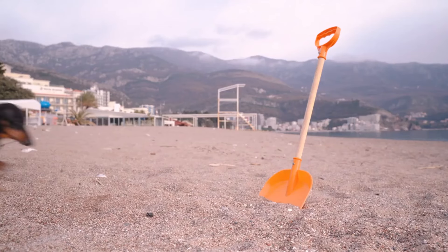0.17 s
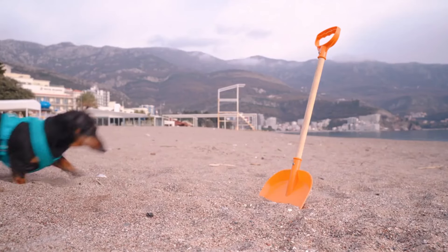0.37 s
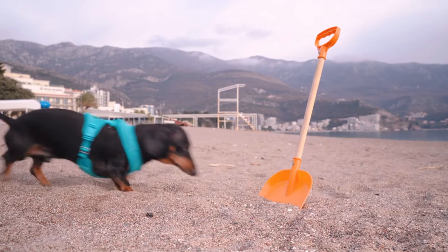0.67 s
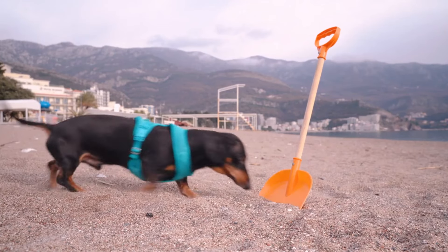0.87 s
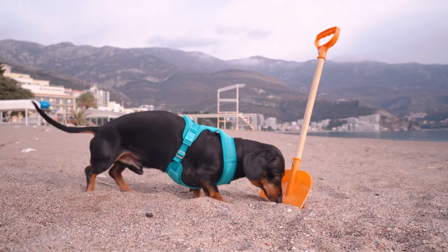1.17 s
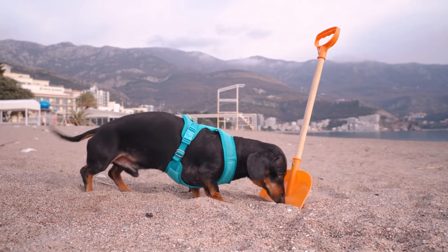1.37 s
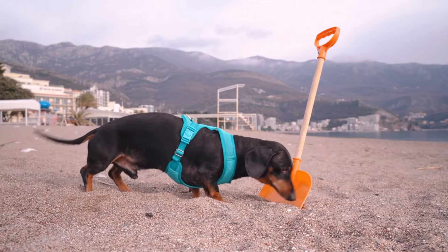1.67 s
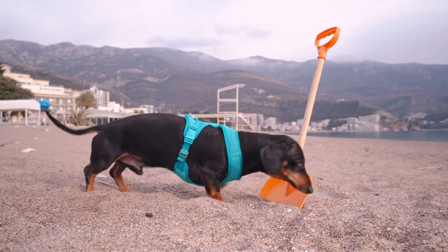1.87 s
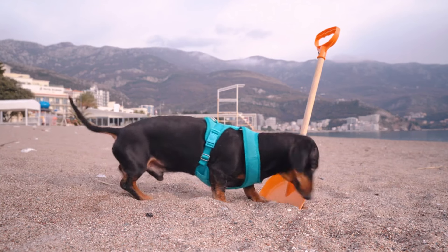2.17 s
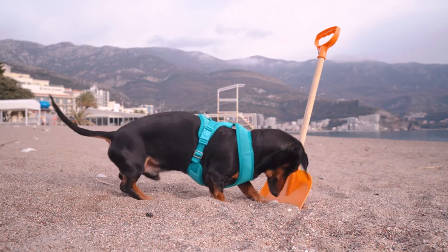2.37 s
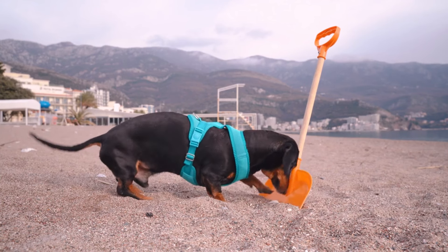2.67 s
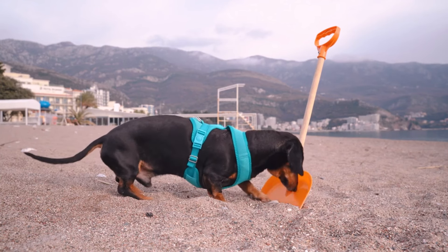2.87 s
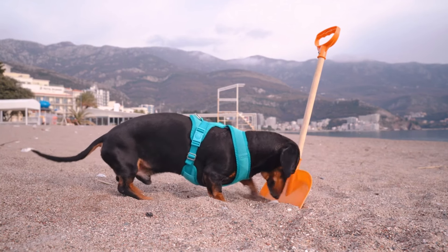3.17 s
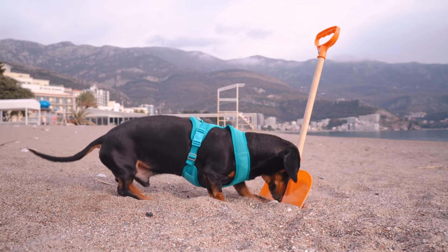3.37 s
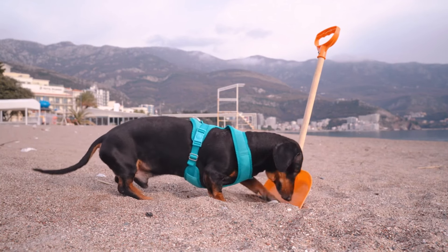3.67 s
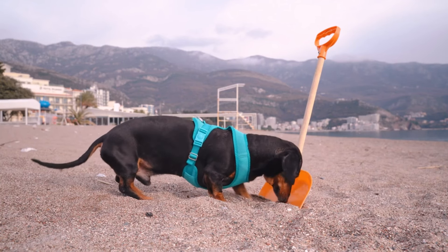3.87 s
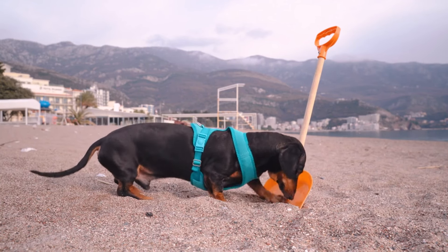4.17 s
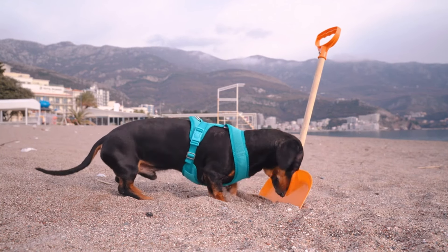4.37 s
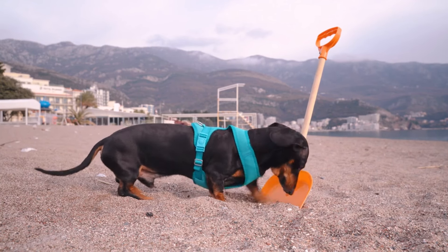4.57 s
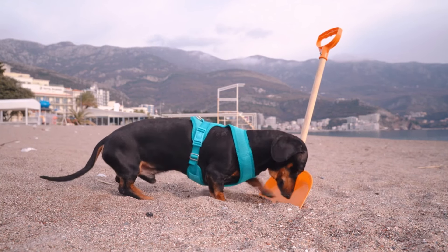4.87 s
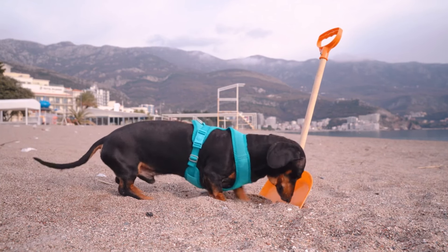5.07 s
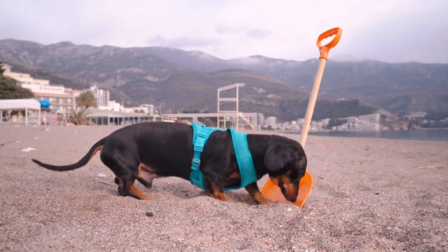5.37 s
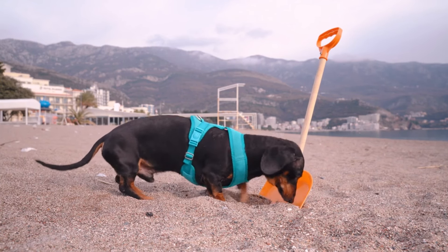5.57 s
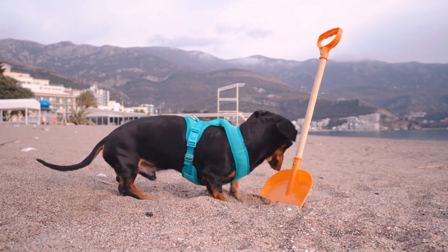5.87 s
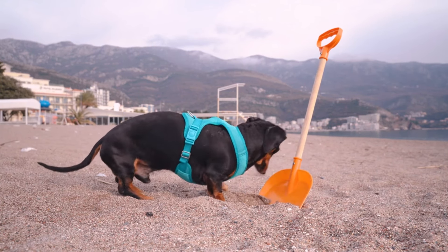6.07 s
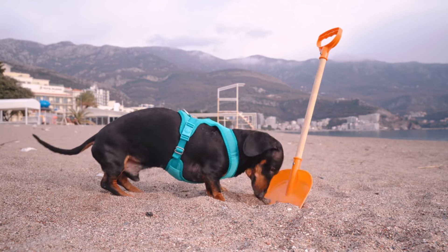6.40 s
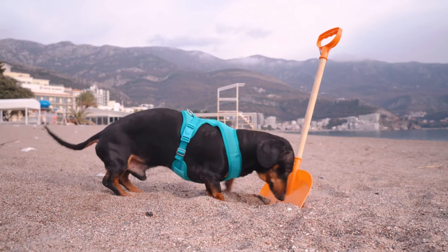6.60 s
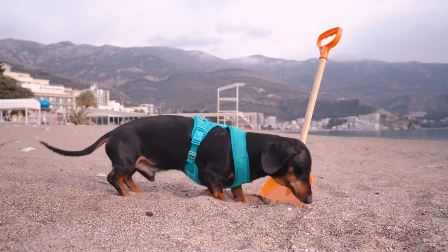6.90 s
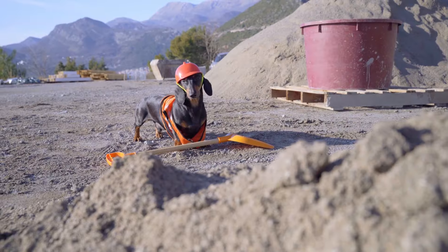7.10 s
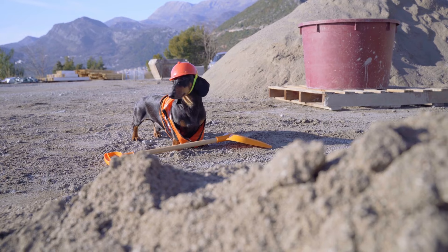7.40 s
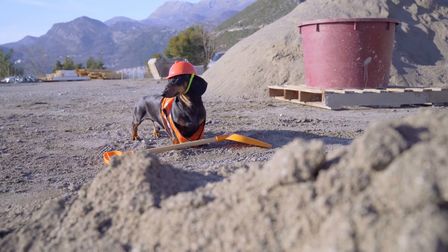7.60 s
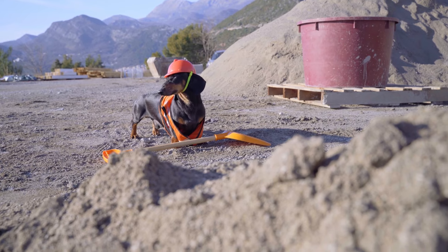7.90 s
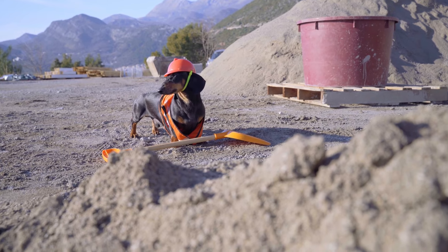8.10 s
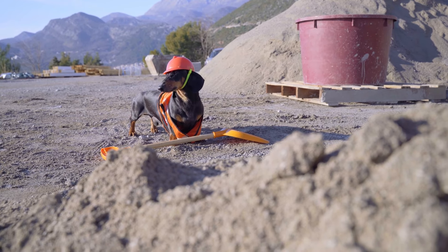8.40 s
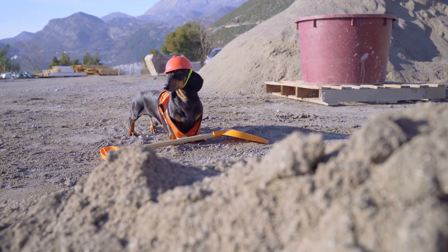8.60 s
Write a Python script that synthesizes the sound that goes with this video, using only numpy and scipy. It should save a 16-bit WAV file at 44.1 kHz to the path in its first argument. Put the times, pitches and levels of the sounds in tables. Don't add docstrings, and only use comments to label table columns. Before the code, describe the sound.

A close, dry outdoor beach sound, with very faint surf, low wind puffs and a distant engine hum throughout. At 0 s a dog's paw rakes coarse sand over a spade blade, with crunch and small stone knocks. Around 0.6 s a stroke brings a very loud sharp clack on the metal; another gritty scrape comes at 1.1 to 1.3 s. Quick, bright, fluttering sniffs run from 1.3 to 1.9 s. Sparse grains tick, a light scrape with a thin ring falls at 2.7 s, and sniffs return from 2.9 to 3.3 s. After near quiet, a hard dig lands at 4.1 s. Three sniffs follow at 4.8 to 5.3 s, overlapping a light scrape and falling grains. From 6.5 s digging resumes, becoming rapid scrapes and knocks from 7 to 8.3 s, strongest near 7.7 s. Loose grains trickle until about 8.7 s.

```python
import sys
import numpy as np
from scipy import signal
from scipy.fft import rfft, irfft, next_fast_len
from scipy.io import wavfile
from scipy.ndimage import uniform_filter1d

SR = 44100
rng = np.random.default_rng(int(sys.argv[2]) if len(sys.argv) > 2 else 0)


def persist_wave(psi):
    counts = np.round(np.clip(psi, -1, 1) * 32767).astype(np.int16)
    wavfile.write(sys.argv[1], SR, np.atleast_2d(counts).T)


def how_loud(loudness_db):
    steps = np.asarray(loudness_db, float) / 20
    return 10 ** steps


N = 385786
T = np.arange(N) / SR

# (pitch_hz, level_db, time to fade by 60 dB ring_s)
BLADE_MODES = [(437, -28.5, 0.12), (860, -30, 0.11), (1010, 7, 0.48), (1460, 8.5, 0.15), (2054, -12.5, 0.2),
               (2400, -11, 0.66), (3300, -4.5, 0.13), (3656, -1.5, 0.05), (4080, -4, 0.17),
               (4840, -13.5, 0.22), (5660, -2, 0.18), (7000, 0.5, .1), (7640, -1, 0.14), (8700, -3, 0.1)]

PAW_RISE_DB_S, PAW_FALL_DB_S = 2999.5, 799
SOFT_RISE_DB_S, SOFT_FALL_DB_S = 348, 400.5


def unit(x):
    return x / np.sqrt(np.mean(x ** 2))


def peak(x):
    return x / np.abs(x).max()


def colour(x, points):
    hz, db = np.transpose(points)
    size = next_fast_len(N)
    bins = np.arange(size // 2 + 1) * SR / size + 1
    gain = how_loud(np.interp(np.log(bins), np.log(hz), db))
    return irfft(rfft(x, size) * gain, size)[..., :N]


def band(x, lo_hz, hi_hz, order=2):
    edges = [lo_hz, min(hi_hz, SR / 2.2)]
    return signal.sosfilt(signal.butter(order, edges, "band", fs=SR, output="sos"), x)


def mode(x, hz, t60):
    pole = np.exp(2j * np.pi * hz / SR - np.log(1000) / (max(t60, .002) * SR))
    return signal.lfilter([1], [1, -pole], x).imag


def walk(rate):
    hold = int(SR / rate)
    levels = np.repeat(rng.standard_normal(N // hold + 1), hold)[:N]
    return .9 * uniform_filter1d(levels, hold)


def strokes(rows, rise_db_s, fall_db_s, tail_db=-99, tail_db_s=100):
    t = np.arange(0, N / SR + .002, .001)[:, None]
    s, length, start_db, end_db, *offset_db = np.transpose(rows)
    length = np.maximum(length, .002)
    hold = start_db + (end_db - start_db) * np.clip((t - s) / length, 0, 1)
    before = np.maximum(s - t, 0)
    after = np.maximum(t - s - length, 0)
    tail = np.maximum(start_db, end_db) + tail_db - tail_db_s * after
    tail = np.where(after > 0, tail, -200)
    db = np.maximum(hold - rise_db_s * before - fall_db_s * after, tail)
    return np.array([np.interp(T, t[:, 0], how_loud((db + o).max(axis=1))) for o in [0] + offset_db])


def grains(rate, scatter_db):
    hits = rng.random(N) < rate / SR
    size = np.minimum(rng.exponential(size=N), 4)
    return unit(hits * np.tanh(rng.standard_normal(N)) * how_loud(scatter_db * size))


def shore():
    # (pitch_hz, level_db per Hz)
    surf_tone = [(35, -42.5), (60, -17.5), (102, -12.5), (179, -25), (220, -16.5), (376, -26.5),
                 (443, -20.5), (486, -30), (521, -21.5), (559, -24), (1320, -27.5), (15500, -47)]
    # (full at start_s, length_s, start_db, end_db)
    puffs = [(0.0, 0.064, -64, -59), (.62, 0.03, -75.5, -51), (1.6, .2, -64.5, -60.5),
             (2.53, 0.11, -52.5, -54), (2.74, .04, -67, -51), (2.98, .06, -55, -59.5),
             (3.15, .05, -63.5, -61), (3.45, .1, -67, -70), (4.04, 0.094, -67.5, -73),
             (4.94, 0.53, -68, -71), (6.55, .06, -55, -68), (7.05, .6, -78, -81.5)]
    # (time_s, level_db)
    engine_db = [
        (0.0, -67.5),
        (3.09, -76),
        (4.75, -71.5),
        (6.02, -62.5),
        (8.75, -68),
    ]
    puff_db_s, calm_db = 160, -74
    mid, side = (colour(rng.standard_normal(N), surf_tone) for _ in range(2))
    surf = unit(mid + how_loud(-7.5) * side * np.array([[1], [-1]]))
    surf = how_loud(-57.5 - 8.0 + 0.67 * walk(0.77)) * surf
    wind = [unit(band(rng.standard_normal(N), 23, 46)) * how_loud(3.7 * walk(6.3)) for _ in range(2)]
    wind_gain = how_loud(2.0) * (how_loud(calm_db) + strokes(puffs, puff_db_s, puff_db_s)[0])
    engine = mode(rng.standard_normal(N), 101., 2.0)
    engine = engine + how_loud(-2) * mode(rng.standard_normal(N), 120., .9)
    engine = engine + how_loud(-5) * mode(rng.standard_normal(N), 230., .6)
    engine_gain = how_loud(-4.5) * how_loud(np.interp(T, *np.transpose(engine_db)))
    return surf + wind_gain * np.array(wind) + engine_gain * unit(engine)


def digging():
    # (full at start_s, length_s, rasp start_db, rasp end_db, spray above rasp offset_db)
    rakes = [(0.0, 0.042, -24, -27.5, 2), (.575, 0.062, -40, -21.5, 0), (1.133, 0.069, -25, -23, 0.5),
             (1.2, 0.15, -22.5, -35, -3.5), (2.672, .19, -30, -43.5, 0), (4.034, 0.0096, -42.5, -36, 1.5),
             (4.046, 0.1, -30, -30.5, 3.5), (4.107, 0.05, -28.5, -25.5, 2.5),
             (4.15, 0.062, -32.5, -41.5, -16.5), (5.284, 0.15, -41, -34.5, -1),
             (5.43, 0.092, -36, -51.5, -1), (6.461, 0.091, -26, -34.5, 1.7),
             (6.526, 0.081, -31.5, -53.5, 4.5), (6.64, 0.076, -49, -56.5, 8),
             (7.034, 0.064, -26, -37.5, -4.5), (7.09, 0.039, -29, -27, -1.5),
             (7.135, 0.021, -30, -28.5, -6.5), (7.172, 0.011, -32, -33.5, -4.5),
             (7.185, .05, -37, -42, -3.5), (7.24, 0.089, -46.5, -40, -8), (7.33, 0.155, -38, -52.5, -6),
             (7.49, 0.039, -41, -45, -1), (7.547, 0.082, -38, -24, -0.5), (7.62, 0.062, -31, -22.5, -8),
             (7.706, 0.061, -37.5, -37.5, -7), (7.771, 0.08, -43.5, -48.5, -3.5), (7.87, 0.1, -50, -55, -3),
             (8.122, 0.17, -32, -42.5, -7.5), (8.322, 0.062, -51, -53.5, -12.5)]
    shuffles = [(.23, 0.011, -67, -55.5, 1), (.565, .02, -47.5, -45, -10.5), (.335, 0.077, -55, -46.5, 1.1),
                (.485, 0.1, -49.5, -58, -3.5), (.88, 0.074, -57.5, -57.5, -4.5),
                (1.04, 0.087, -59, -38, -1.5), (2.555, 0.13, -57.5, -56.5, -6),
                (3.7, 0.055, -75.5, -71.5, -14), (4.45, .33, -72, -76, -1.5),
                (5.565, 0.31, -57, -72.5, 0.5), (5.82, 0.2, -72, -78.5, 4), (6.8, 0.113, -61.5, -53, -0.2),
                (6.945, 0.084, -60.5, -34.5, -0.5), (7.42, 0.016, -51.5, -53, 4),
                (8.04, 0.083, -69.5, -46, -4), (8.43, 0.15, -73.5, -54, -3),
                (8.6, 0.16, -63.5, -71.5, -2.5)]
    # (full at start_s, length_s, lumps start_db, lumps end_db, weight above lumps offset_db)
    crushes = [(.008, 0.037, -15.5, -29, -5), (.58, 0.07, -52.5, -25.5, -4),
               (1.133, 0.068, -31, -28, -34.5), (1.22, 0.07, -36, -36, -20),
               (1.287, 0.019, -26.5, -32.5, -17), (4.047, 0.063, -40.5, -40.5, -16),
               (4.111, 0.071, -19, -32, -3), (6.461, 0.073, -49, -28.5, -11),
               (7.034, 0.048, -22.5, -39, -10), (7.112, 0.16, -25, -56, -10),
               (7.33, 0.074, -42.5, -63, -30.5), (7.41, .12, -47, -30, 1.5), (7.55, 0.1, -38, -25.5, -5.5),
               (7.67, 0.12, -28.5, -40, -26.5), (7.74, 0.09, -42.5, -36, -34.5),
               (7.85, 0.14, -46.5, -49.5, 4), (8.128, 0.14, -30, -36.5, -35)]
    treads = [(.24, 0.0099, -56, -51.5, -13), (.35, 0.27, -53, -67, -33), (.66, 0.14, -60, -52, -12),
              (.87, 0.067, -54.5, -56, -20), (1.03, 0.11, -68.5, -46.5, -16), (1.325, 0.25, -51.5, -66, -4),
              (2.67, 0.28, -57, -59.5, -4.5), (5.12, 0.21, -75, -56.5, -7), (5.43, 0.18, -50.5, -62, -4),
              (6.82, 0.3, -65.5, -49.5, -24), (8.289, 0.11, -61, -61, -25), (8.53, 0.066, -59, -60, -27.5)]
    grit_gain = strokes(rakes, PAW_RISE_DB_S, PAW_FALL_DB_S, -20.5, 134.5)
    grit_gain = grit_gain + strokes(shuffles, SOFT_RISE_DB_S, SOFT_FALL_DB_S)
    lump_gain = strokes(crushes, PAW_RISE_DB_S, PAW_FALL_DB_S, -25, 208)
    lump_gain = lump_gain + strokes(treads, SOFT_RISE_DB_S, SOFT_FALL_DB_S)
    return (*grit_gain, *lump_gain)


def blade(push, damping, sway_db=None):
    sway_db = np.zeros(len(BLADE_MODES)) if sway_db is None else sway_db
    out = 0
    for (hz, db, t60), sway in zip(BLADE_MODES, sway_db):
        ring_s = t60 * damping
        share = how_loud(db) * np.sqrt(1 / (ring_s * SR))
        out = out + share * mode(push * how_loud(sway), hz, ring_s)
    return out


def pebbles(low_hz, span, count=200):
    ring_s, hits_per_s = .075, 400
    t = np.arange(int(ring_s * SR)) / SR
    size = np.arange(count)[:, None] / count
    rings = how_loud(-6 * size) * np.sin(2 * np.pi * low_hz * span ** size * t) * 1000 ** (-t / ring_s)
    out = np.zeros(N + len(t))
    for place, which, force in rng.random((int(hits_per_s * N / SR), 3)):
        start = int(place * N)
        out[start:start + len(t)] += how_loud(14 * force) * rings[int(which * count)]
    return unit(out[:N])


def grit(slide, spray, ring):
    # (pitch_hz, level_db per Hz)
    grit_tone = [(880, -31.5), (1500, 3), (2860, -8), (3210, -7), (4440, -6), (5670, -4.5), (6960, -7),
                 (9990, -4.5), (15500, -15.5)]
    # (full at start_s, length_s, start_db, end_db)
    singing = [
        (2.68, .02, -42, -42.5),
        (5.425, .05, -40, -45.5),
        (7.105, .02, -44, -46),
    ]
    rasp = (grains(8000., 2.6) + .28 * grains(300., 2.8)) * how_loud(2.0 * walk(130))
    sway_db = [7 * walk(14) for _ in BLADE_MODES]
    upper = band(blade(rasp, damping=.45, sway_db=sway_db), 1900, 10000, order=3)
    hiss = unit(colour(rasp, grit_tone)) + how_loud(-5) * unit(upper) + how_loud(-7) * pebbles(1600, 6)
    coarse = colour(hiss, [(1200, -18), (2000, 0), (6000, 0), (7300, -6), (9500, -40)])
    fine = colour(hiss, [(5500, -40), (7300, -6), (8500, 0)])
    buried = ring * unit(mode(rasp * how_loud(5 * walk(12)), 1425., .035))
    free = strokes(singing, 700, 300)[0] * rasp
    free = mode(free, 1418., .45) / np.std(mode(rasp, 1418., .45))
    return how_loud(2.23) * slide * unit(coarse) + how_loud(-0.3) * spray * unit(fine) + how_loud(6.5) * buried + free


def crush(lumps, weight):
    crumbs = grains(3000., 2.0) * how_loud(2.0 * walk(90))
    body = unit(band(crumbs, 380, 1450, order=3)) + how_loud(-4) * pebbles(400, 3.5)
    thud = unit(band(grains(1500., 0.59), 120, 420, order=3))
    return how_loud(-2.0) * lumps * body + how_loud(-7.0) * weight * thud


def knocks():
    # (start_s, peak level_db, brightness_db, pitch_hz, ring_s to fade 60 dB)
    stones = [(.0071, -8.5, 0, 1400, 0.027), (.0093, -2.5, -4, 760, .018),
              (.0120, -8.5, -10, 800, 0.01), (0.0207, -13, -8.5, 900, 0.0082),
              (.0318, -16.5, -5.5, 850, .015), (.0490, -17, -5, 1045, 0.012),
              (0.0509, -6, -3, 1080, 0.013), (.0635, -17.5, -12, 2400, 0.007),
              (.243, -37.5, -12, 1010, 0.048), (0.6411, 4, -0.5, 930, 0.027),
              (0.6434, 6, -1, 1050, 0.0097), (0.6445, 0, -5, 1410, 0.044),
              (1.1313, -18, -0.5, 1800, 0.013), (1.145, -10.5, -3, 1290, 0.02),
              (1.189, -18, -11.5, 1300, 0.049), (1.197, -15, -8.5, 800, .02),
              (1.2135, -16.5, -14, 1600, 0.028), (1.2865, -16.5, -21, 1000, 0.014),
              (1.2915, -13.5, -18, 1100, 0.014), (1.303, -19, -9.5, 1000, 0.035),
              (1.369, -28, -17.5, 940, .035), (2.673, -27.5, -0.5, 1420, 0.082),
              (4.1092, -7, -4.5, 1506, 0.062), (4.1111, -6.5, -18, 750, 0.0071),
              (4.1134, -5.5, -14.5, 1500, 0.053), (4.1252, -18.5, -9.5, 700, 0.014),
              (4.1349, -6.5, 1.5, 1800, 0.022), (4.1402, -10.5, 3.5, 1900, .02),
              (4.1572, -10.5, -15.5, 950, 0.034), (5.085, -43.5, -12, 1040, 0.03),
              (5.201, -50, -9.5, 1220, .035), (5.284, -39, -16, 700, 0.012),
              (5.358, -28, -20, 1450, 0.11), (5.369, -18.5, 1, 2300, 0.03),
              (5.513, -44, -20, 620, .025), (5.540, -53, -16, 600, 0.013),
              (5.5655, -28, 4, 1800, .015), (5.577, -41.5, -16, 800, .02),
              (6.467, -11.5, 4, 1435, .05), (6.526, -21, 0, 1430, .035),
                    (7.0309, -15.5, -9, 1280, .05), (7.039, -17.5, -20, 900, .03),
                    (7.049, -15.5, -12, 600, .025), (7.088, -20, -7, 2200, .035),
                    (7.104, -17, -11, 1450, .06), (7.118, -20, 2, 1450, .04), (7.1289, -21.5, 5, 600, .02),
                    (7.155, -18, -16, 1500, .04), (7.174, -22, -12, 950, .02),
                    (7.333, -25, -22, 1450, .035), (7.463, -21, -18, 820, .02),
                    (7.486, -23, -36, 720, 0.019), (7.509, -24, -20, 900, .025),
                    (7.527, -33, -18, 750, .02), (7.548, -19, 1, 1470, .035),
                    (7.572, -25, -11.5, 2080, .04), (7.5902, -9, -4, 1660, .05),
                    (7.6175, -10, -9.5, 1000, .025), (7.6215, -7.5, -8, 1450, .04),
                    (7.635, -12, -5, 1250, .02), (7.648, -19.5, 5.5, 2500, .015),
                    (7.6655, -10.5, -7, 1500, .02), (7.668, 3, 1, 1000, .022),
                    (7.6703, -2.5, 2, 1000, .025), (7.688, -14.5, -13, 1500, .04),
                    (7.7277, -11, -3, 900, .025), (7.758, -24, -12, 810, .02),
                    (7.798, -17, -10, 1050, .035), (7.826, -25.5, -13, 2500, .015),
                    (7.894, -31.5, -25, 750, .025), (8.031, -43, -7, 1450, .02),
                    (8.1242, -3.5, 2, 2000, .01), (8.1261, -8.5, -9.5, 1540, .025),
                    (8.128, -6, 5, 3300, .01), (8.136, -26, -23, 650, .015), (8.1425, -15, -25, 850, .02),
                    (8.2197, -7, -5, 1100, 0.029), (8.2211, -10.5, -6.5, 1050, .018)]
    # (start_s, peak level_db, pitch_hz)
    thumps = [(.010, -34.5, 130), (.03, -32.5, 65), (.641, -29.5, 130), (0.644, -20.5, 260),
              (4.112, -27.5, 140), (4.111, -16.5, 380), (7.047, -22, 330), (6.531, -50.5, 120),
              (7.048, -42, 129), (7.127, -33.5, 143), (7.67, -34.5, 147)]
    thump_cycles = 10
    t = np.arange(8820) / SR
    out = np.zeros(N + len(t))
    for s, peak_db, bright_db, note_hz, t60 in stones:
        rattle = rng.standard_normal(len(t)) * np.exp(-t / .0006)
        rattle[0] = 7
        ringing = blade(rattle, damping=3 * t60)
        note = peak(band(mode(rattle, note_hz, t60), 330, 9000))
        low = peak(band(ringing, 250, 2500)) + how_loud(12.5) * note
        low = low + how_loud(-9.5) * peak(band(rattle, 450, 4500))
        scatter = rattle + 2.5 * rng.standard_normal(len(t)) * np.exp(-t / .0018)
        crack = peak(band(scatter, 1900, 6500)) + how_loud(-5.0) * peak(band(ringing, 2900, 5700))
        knock = peak(peak(low) + how_loud(bright_db + 6.0) * peak(crack))
        start = int(s * SR)
        out[start:start + len(t)] -= how_loud(peak_db) * knock
    for s, peak_db, hz in thumps:
        thump = np.sin(2 * np.pi * hz * t) * 1000 ** (-t * hz / thump_cycles)
        start = int(s * SR)
        out[start:start + len(t)] += how_loud(peak_db) * thump
    return out[:N]


def ticks():
    # (start_s, peak level_db, pitch_hz)
    drops = [(0.1007, -23, 3120), (0.1137, -22.5, 8590), (0.2141, -35, 5880), (0.2442, -29.5, 8800),
             (0.3237, -28, 5360), (0.7166, -21, 7600), (0.792, -29.5, 3790), (0.9087, -32, 3430),
             (1.9946, -41.5, 9600), (2.1364, -46.5, 7340), (2.2446, -39.5, 3170), (2.3496, -39, 4110),
             (2.567, -34, 5140), (2.582, -32, 8700), (3.8494, -51.5, 3050), (4.2444, -40, 6140),
             (4.289, -44.5, 7000), (4.3124, -62, 3357), (4.4633, -42.5, 5910), (4.7262, -44.5, 3850),
             (5.5663, -37, 3880), (5.6047, -29, 4000), (5.5835, -34, 4000), (5.6335, -29.5, 4520),
             (5.6432, -32, 4150), (1.917, -24, 4925), (5.7523, -39, 6830), (5.822, -36, 8070),
             (5.8547, -31, 4000), (5.9189, -32, 3310), (8.5111, -46, 7200), (8.5914, -37, 3200),
             (8.6799, -36, 4600), (8.7118, -32, 6350)]
    t = np.arange(441) / SR
    out = np.zeros(N + len(t))
    for s, peak_db, hz in drops:
        click = peak(band(rng.standard_normal(len(t)) * np.exp(-t / .0006), 2200, 14000))
        note = how_loud(-7) * np.sin(2 * np.pi * hz * t) * np.exp(-t / .0012)
        start = int(s * SR)
        out[start:start + len(t)] += how_loud(peak_db - 1.5) * (click + note)
    return out[:N]


def strays():
    # (full at start_s, length_s, start_db, end_db)
    rolling = [
        (.66, .3, -62, -68),
        (1.98, .4, -78, -82),
        (3.55, .35, -78, -78),
        (4.22, .52, -70, -73),
        (5.5, .3, -62, -74),
        (7.7, .2, -58, -66),
    ]
    clicks = band(grains(90., 4.0), 2000, 13000)
    return strokes(rolling, SOFT_RISE_DB_S, SOFT_FALL_DB_S)[0] * unit(clicks)


def sniffs():
    # (full at start_s, length_s, airflow start_db, airflow end_db)
    breaths = [(1.305, .085, -23.5, -25.5), (1.44, 0.11, -22.5, -22.5), (1.565, .035, -33, -28),
               (1.608, .104, -22, -23.5), (1.756, 0.1, -21.5, -24), (1.875, .052, -30.5, -30),
               (2.888, 0.027, -29.5, -29), (2.93, .06, -18.5, -19), (3.064, .12, -17.5, -21.5),
               (3.244, 0.074, -19.5, -20), (4.797, 0.019, -35.5, -29.5), (4.818, 0.091, -22, -25.5),
               (4.99, .06, -18, -24), (5.128, .144, -18.5, -25.5)]
    # (pitch_hz, level_db per Hz)
    nose_tone = [(260, -66), (450, -38.5), (778, -29), (972, -28), (1230, -21), (1700, -41.5), (1880, -8.5),
                 (4340, 2.5), (6000, -3), (6800, -4), (8960, 0.5), (13600, 2.5), (14800, -5), (15900, -4.5)]
    # (pitch_hz, width_hz, level_db)
    nostrils = [(2080, 710, -32), (4820, 910, -16), (5790, 900, -21), (7750, 570, -20), (9770, 400, -19.5)]
    air = rng.standard_normal(N) * how_loud(1.8 * walk(500) + .7 * walk(40))
    whistle = 0
    for hz, width, db in nostrils:
        whistle = whistle + how_loud(db + 8.3 * walk(25)) * unit(mode(air, hz, 1.1 / width))
    whistle = signal.sosfilt(signal.butter(8, 1850, "high", fs=SR, output="sos"), whistle)
    airflow = strokes(breaths, 1250, 901.5, -16.5, 241.5)[0]
    return airflow * unit(unit(colour(air, nose_tone)) + whistle)


def widen(x, wide_db):
    # (pitch_hz, level_db)
    side_tone = [(60, -9), (110, -11), (200, -13), (380, -15.5), (700, -17), (1290, -22), (2380, -15.5),
                 (4400, -14), (8120, -12), (15000, -14.5)]
    side = colour(x * unit(walk(180)), side_tone)
    return x + how_loud(wide_db) * side * np.array([[1], [-1]])


def scene():
    far = shore()
    slide, spray, lumps, weight = digging()
    ring = how_loud(-16) * slide + how_loud(-14.5) * lumps
    dig = grit(slide, spray, ring) + crush(lumps, weight) + knocks() + ticks() + strays()
    return widen(dig, .3) + widen(sniffs(), 4.0) + far


def band_limit(x):
    return signal.sosfilt(signal.butter(12, 16330, fs=SR, output="sos"), x)


def record(dry):
    limited = dry / (1 + (dry / .85) ** 4) ** .25
    cut = signal.ellip(8, .2, 70, 15950, fs=SR, output="sos")
    return band_limit(signal.sosfilt(cut, limited))


dry = scene()
out = record(dry)
persist_wave(out)
```